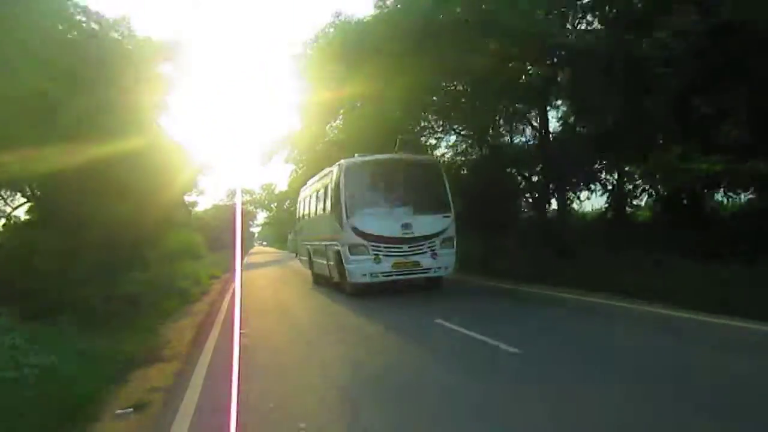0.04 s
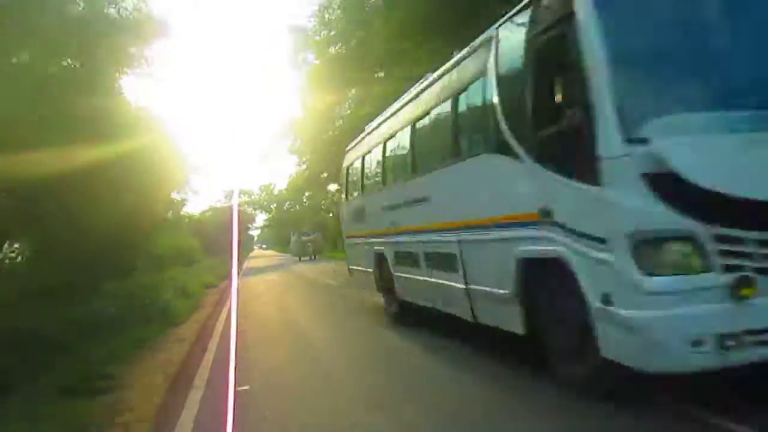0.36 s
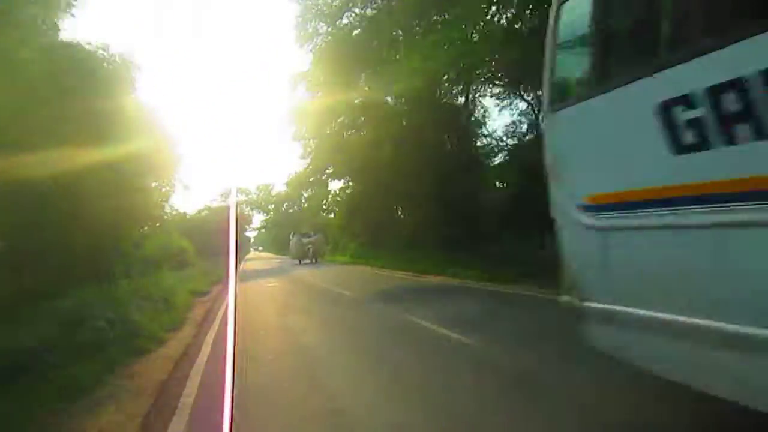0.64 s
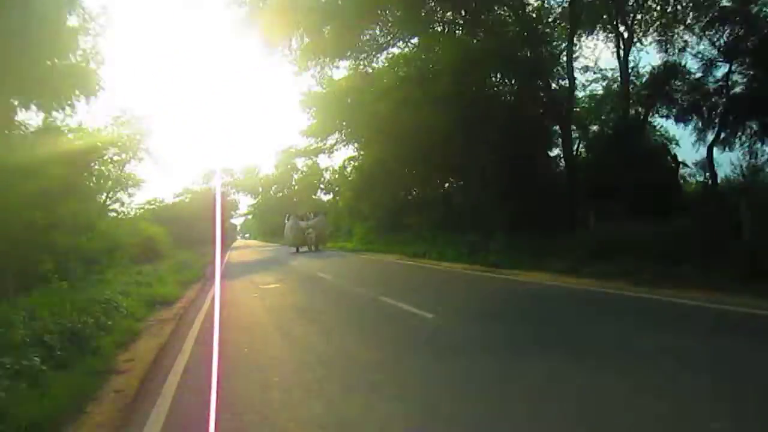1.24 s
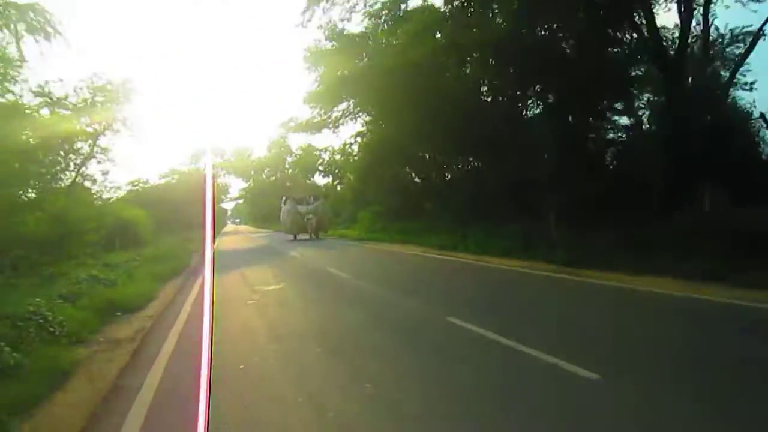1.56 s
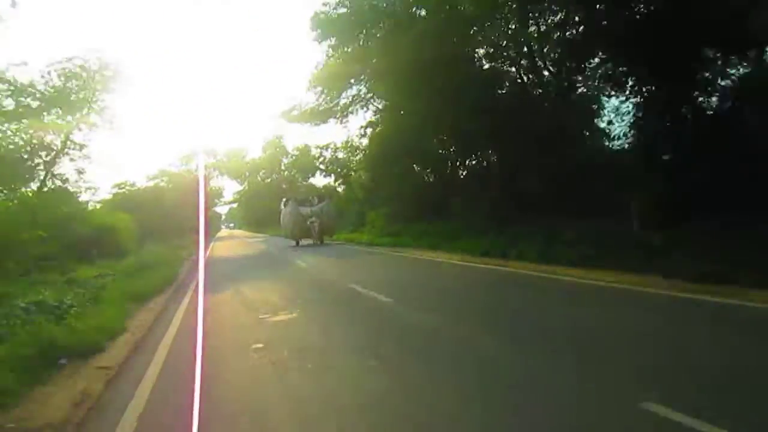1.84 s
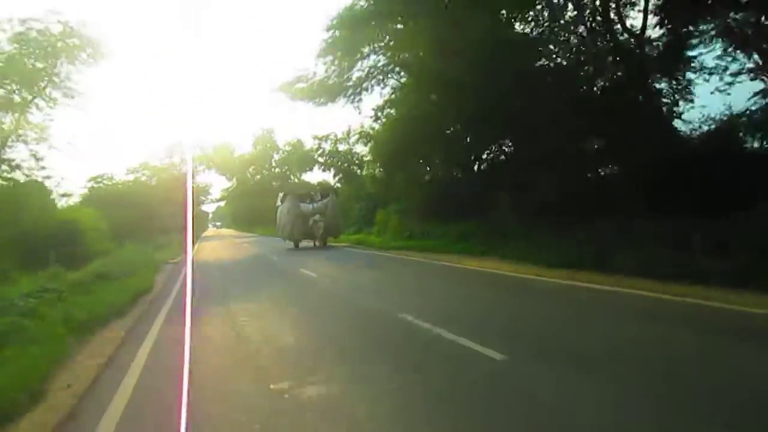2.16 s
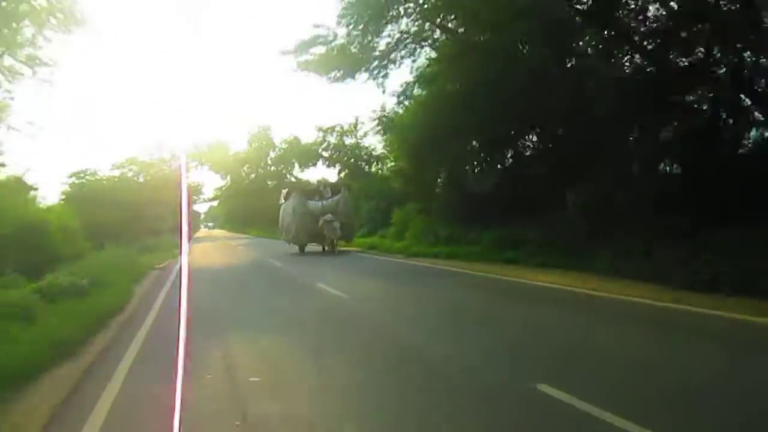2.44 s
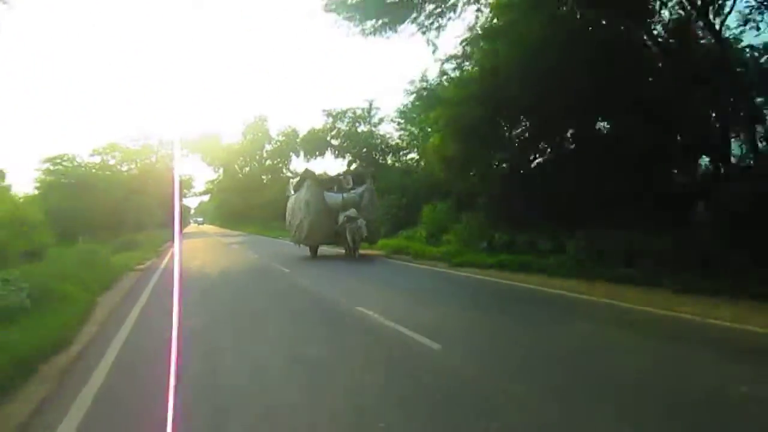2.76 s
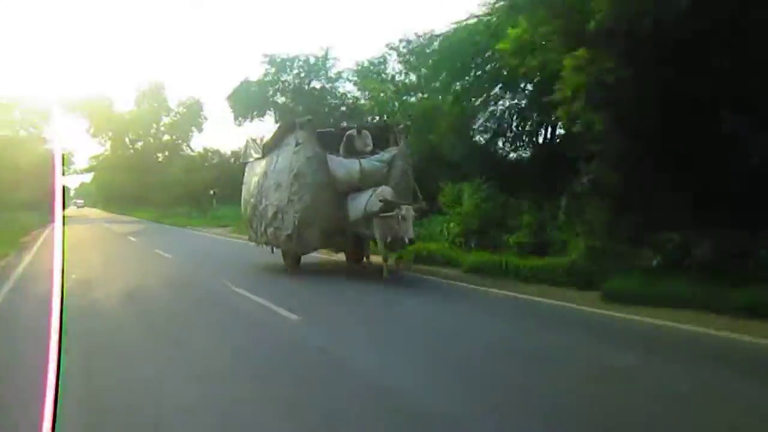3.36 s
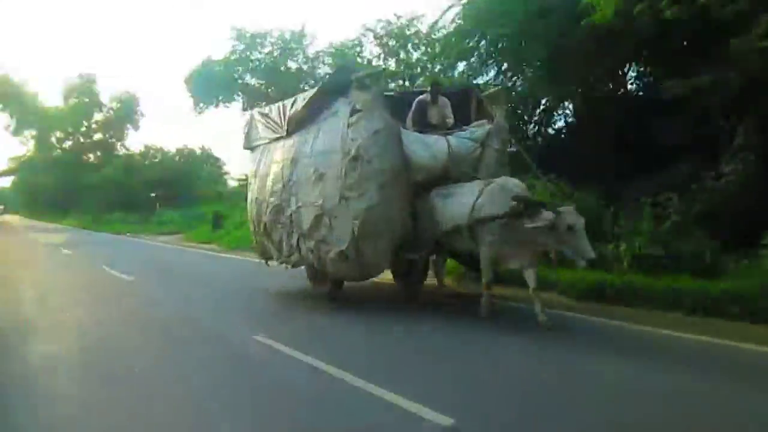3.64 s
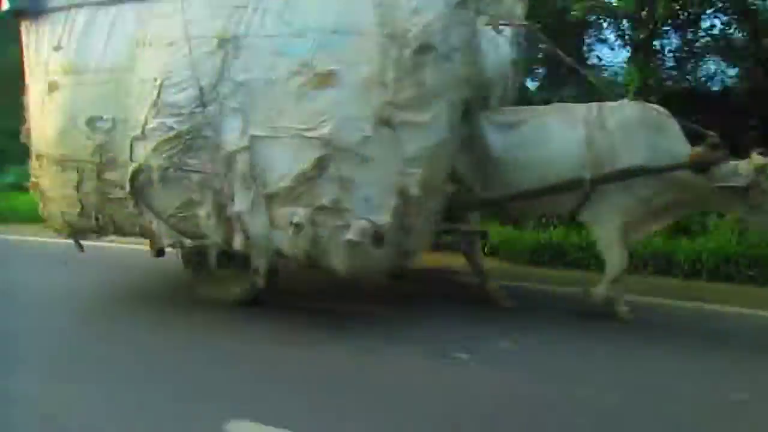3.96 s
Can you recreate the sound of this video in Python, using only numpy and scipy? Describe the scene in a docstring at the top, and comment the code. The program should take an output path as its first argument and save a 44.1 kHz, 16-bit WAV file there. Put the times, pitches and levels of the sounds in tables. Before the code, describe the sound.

Gusts of wind roar and flutter against a microphone riding along a country road, distorting into a crackle at their strongest. Low road rumble and faint tyre hiss run underneath, and dull thuds of air come near the end.

```python
"""Country road, on a moving vehicle: wind beats on the microphone over low road rumble and faint tyre hiss.
Each gust strengthens the large eddies a little and the small ones a lot; the strongest add a bright
rush of air. Single eddies hit as short slaps or dull thuds. The microphone overloads, so gusts and
slaps flatten into a rasping crackle."""
import sys
import numpy as np
from scipy import signal
from scipy.fft import rfft, irfft
from scipy.io import wavfile
from scipy.ndimage import map_coordinates

SR = 44100
rng = np.random.default_rng(int(sys.argv[2]) if len(sys.argv) > 2 else 0)


def put_to_file(sound):
    """Save the sound as 16-bit audio at rate SR, in the file named by the first command-line argument."""
    columns = np.atleast_2d(sound).T  # one column per channel
    safe = np.clip(columns, -1, 1)
    whole_steps = np.round(safe * 32767)
    wavfile.write(sys.argv[1], SR, whole_steps.astype(np.int16))


N = 176400

# gust strength at the microphone: t/s, level/dB
GUST_DB = [(0, -34.5), (.13, -27.5), (.3, -22.5), (.45, -20), (.7, -24.5), (.8, -28), (.87, -30.5),
           (1.03, -31), (1.12, -37), (1.18, -33), (1.29, -40.5), (1.37, -33), (1.48, -26), (1.56, -36.5),
           (1.62, -26.5), (1.7, -34), (1.8, -30), (1.88, -30.5), (1.98, -26.5), (2.08, -31.5), (2.2, -26),
           (2.3, -27.5), (2.39, -27), (2.44, -18), (2.6, -19.5), (2.75, -24), (2.85, -31), (2.97, -34),
           (3.08, -35.5), (3.16, -29), (3.3, -28.5), (3.42, -33.5), (3.6, -37), (3.7, -26.5), (3.8, -21),
           (3.84, -20.5), (4, -21.5)]
# mid-range roar, on top of the gusts: t/s, level/dB
ROAR_DB = [(0, 5.5), (.45, -1.5), (.85, 0.5), (1.25, 2), (1.7, .5), (1.85, 1), (1.97, 1.5), (2.25, 1),
           (2.5, 0), (2.8, 1), (3.05, -5), (3.3, -1), (3.58, -10.5), (3.78, -2.5), (3.95, -7.5)]
# large-eddy spectrum: f/Hz, level/dB
LARGE_EDDY_SPECTRUM_DB = [(20, -31), (60, -19), (130, -5.5), (220, -3), (330, -1), (480, 1), (800, -1.5),
                          (1100, -7), (1600, -16.5), (2400, -37.5), (4000, -60.5), (9000, -62)]
# small-eddy spectrum: f/Hz, level/dB
SMALL_EDDY_SPECTRUM_DB = [(100, -20.5), (500, -6), (1100, 4.5), (1800, -2), (3000, -9.5), (4500, -22),
                          (7000, -34.5), (14000, -53.5)]
# lulls, air leaves the microphone opening: t/s, depth/dB, length/s
LULLS = [(.06, 6, 0.076), (.78, 6, 0.026), (.94, 8.5, 0.028), (.975, 5, 0.012), (1.07, 4.5, 0.033),
         (1.133, 6.5, .03), (1.28, 6.5, 0.039), (1.545, 2.5, 0.028), (1.584, 15, 0.011),
         (1.668, 15, 0.0082), (1.823, 8, 0.073), (2.017, 11, 0.02), (2.293, 10, 0.019), (2.82, 27, 0.0056),
         (2.922, 6.5, 0.018), (3.005, 7, 0.024), (3.068, 6.5, 0.035), (3.22, 17, 0.0054),
         (3.335, 13, 0.012), (3.388, 9, 0.019), (3.42, 12, 0.0084), (3.49, -3.5, 0.0074), (3.555, 3, 0.034),
         (3.692, 14, 0.011), (3.722, 14, 0.0053)]
# low buffeting and road rumble: t/s, level/dB
RUMBLE_DB = [(0, -29), (.7, -25), (1.25, -29), (1.65, -26.5), (1.85, -24.5), (2.5, -22), (2.95, -24),
             (3.12, -16.5), (3.35, -20.5), (3.53, -19.5), (3.64, -21.5), (3.8, -15), (4, -20.5)]
# rumble spectrum: f/Hz, level/dB
RUMBLE_SPECTRUM_DB = [(15, -22.5), (35, -8.5), (70, -1), (140, -2.5), (280, -5), (500, -6.5), (1000, -40.5),
                      (3000, -60.5)]
# tyre and air hiss: t/s, level/dB
HISS_DB = [(0, -37), (.5, -40), (1.2, -40.5), (2.2, -39), (3, -40.5), (3.6, -30), (4, -42)]
# hiss spectrum: f/Hz, level/dB
HISS_SPECTRUM_DB = [(200, 6), (1200, 10), (2500, -5.5), (5000, -17), (8000, -23), (11000, -32.5),
                    (16000, -26)]
# slaps of air: t/s, relative peak level/dB, length/s
SLAPS = [(0.024, -10.5, 0.0084), (0.044, -19, 0.0041), (0.749, -17, 0.017), (.832, -21.5, 0.0082),
         (.915, -24, .01), (1.011, -18, 0.0096), (1.172, -36, 0.016), (1.48, -21.5, 0.04),
         (1.613, -15.5, 0.0068), (1.649, -13, 0.0096), (1.686, -10.5, 0.0096), (1.71, -13.5, 0.0034),
         (1.726, -14.5, 0.0031), (1.783, -24, .01), (2.054, -16.5, 0.023), (2.137, -10, 0.0021),
         (2.147, -4, 0.0028), (2.162, -8.5, 0.0068), (2.185, -11.5, 0.0079), (2.68, -10.5, 0.011),
         (2.837, -23.5, 0.0044), (2.888, -18, 0.0099), (3.036, -19, 0.023), (3.143, -22, 0.0087),
         (3.183, -19, 0.0036), (3.199, -11.5, 0.0052), (3.251, -18.5, .008), (3.705, -19.5, 0.0027),
         (3.751, -8.5, 0.0024), (3.81, -11, 0.008), (3.849, -15, 0.0073)]
# slap spectrum: f/Hz, level/dB
SLAP_SPECTRUM_DB = [(60, -12), (300, 2), (800, 3), (1600, -3), (3000, -9.5), (5000, -23.5), (8000, -37.5),
                    (14000, -53)]
# bright rush of air: t/s, level/dB
RUSH_DB = [(0, -42), (.2, -42), (.45, -25), (.7, -37.5), (.85, -59.5), (2.34, -63), (2.42, -28.5),
           (2.5, -28), (2.61, -19), (2.74, -36), (2.85, -60), (3.65, -60), (3.84, -34), (3.9, -21.5),
           (3.96, -14.5), (4, -20)]
# rush spectrum: f/Hz, level/dB
RUSH_SPECTRUM_DB = [(200, -17.5), (900, -6.5), (1700, 3.5), (3100, -1.5), (4500, -9), (7000, -24.5),
                    (14000, -49)]
# thuds of large slow eddies: t/s, peak level/dB, length/s
THUDS = [(3.16, -18, .08), (3.625, -11, 0.064), (3.82, -15, 0.1)]
# thud spectrum: f/Hz, level/dB
THUD_SPECTRUM_DB = [(50, -38), (100, -11), (140, -3.5), (190, -8.5), (300, -10), (600, -31), (1500, -66)]
# microphone response: f/Hz, gain/dB
MIC_RESPONSE_DB = [(20, -0.5), (2000, 0), (4000, -1.5), (7000, -2.5), (11000, -6.5), (16000, -9.5)]

GUST_REF_DB = -26.5  # gust strength at which LARGE_DB and SMALL_DB hold
LARGE_DB, LARGE_DB_PER_DB, LARGE_FLUTTER_DB = -10.5, 0.31, 1.8
SMALL_DB, SMALL_DB_PER_DB, SMALL_FLUTTER_DB = -26.5, 1.44, 1.7
FLUTTER_PER_S, BURSTS_PER_S = 130, 480


def undb(db):
    """Decibels to gain."""
    return 10 ** (np.asarray(db) / 20)


def curve(rows):
    """Linear interpolation of (t/s, value) rows."""
    times_s, values = np.array(rows, float).T
    return np.interp(np.arange(N) / SR, times_s, values)


def colour(x, response_db):
    """Filter by (f/Hz, gain/dB) rows, interpolated in log frequency."""
    f_hz, gain_db = np.array(response_db, float).T
    bins_hz = np.maximum(np.arange(N // 2 + 1) * SR / N, 1)
    gain = undb(np.interp(np.log(bins_hz), np.log(f_hz), gain_db))
    return irfft(rfft(x) * gain, N)


def noise(spectrum_db):
    """Random pressure of given spectral shape, rms 1."""
    x = colour(rng.standard_normal(N), spectrum_db)
    return x / x.std()


def jitter(rate_per_s):
    """Smooth random signal, standard deviation 1."""
    knots = rng.standard_normal(8192)
    x = map_coordinates(knots, [np.arange(N) / SR * rate_per_s], order=3, mode="wrap")
    return x / x.std()


def swells(rows):
    """One Gaussian hump per (t/s, height, length/s) row."""
    t_s = np.arange(N) / SR
    return sum(height * np.exp(-(2 * (t_s - at_s) / length_s) ** 2) for at_s, height, length_s in rows)


def wind(burst_db=6):
    """Large eddies roar, small ones tear past in bursts; both flutter together and drop in the lulls."""
    gust_db = curve(GUST_DB) - GUST_REF_DB
    flutter = jitter(FLUTTER_PER_S)
    large_db = LARGE_DB + LARGE_DB_PER_DB * gust_db + curve(ROAR_DB) + LARGE_FLUTTER_DB * flutter
    small_db = SMALL_DB + SMALL_DB_PER_DB * gust_db + SMALL_FLUTTER_DB * flutter
    small_db += burst_db * jitter(BURSTS_PER_S)
    roar = undb(large_db) * noise(LARGE_EDDY_SPECTRUM_DB)
    tearing = undb(small_db) * noise(SMALL_EDDY_SPECTRUM_DB)
    return (roar + tearing) * undb(-swells(LULLS))


def road(throb_db=0.58, throb_per_s=18):
    """Throbbing low rumble under smooth tyre and air hiss."""
    rumble = noise(RUMBLE_SPECTRUM_DB) * undb(curve(RUMBLE_DB) + throb_db * jitter(throb_per_s))
    hiss = noise(HISS_SPECTRUM_DB) * undb(curve(HISS_DB))
    return rumble + hiss


def eddy_hits(hits, spectrum_db, burst_db=2.4):
    """Single eddies hit the opening head on, each a brief, ragged pressure swell."""
    envelope = swells([(at_s, undb(peak_db), length_s) for at_s, peak_db, length_s in hits])
    return envelope * noise(spectrum_db) * undb(burst_db * jitter(BURSTS_PER_S))


def rush(burst_db=3):
    """Fast air of the strongest gusts tears across the opening."""
    return noise(RUSH_SPECTRUM_DB) * undb(curve(RUSH_DB) + burst_db * jitter(BURSTS_PER_S))


def scene(slap_gain_db=4):
    """Total pressure at the microphone, mono."""
    slaps = undb(slap_gain_db) * eddy_hits(SLAPS, SLAP_SPECTRUM_DB)
    thuds = eddy_hits(THUDS, THUD_SPECTRUM_DB)
    return (wind() + slaps + thuds + rush() + road())[None]


def record(dry, ceiling=0.46, knee=2.97, asymmetry=0.02, coupling_hz=22, top_hz=15800):
    """Microphone: soft, slightly uneven overload, then deep-bass loss, dulled treble, steep top cut."""
    drive = dry[0] / ceiling
    biased = drive * (1 - asymmetry * np.sign(drive))
    flattened = ceiling * drive / (1 + np.abs(biased) ** knee) ** (1 / knee)
    highpass = signal.butter(1, coupling_hz, "high", fs=SR, output="sos")
    lowpass = signal.ellip(10, .1, 80, top_hz, fs=SR, output="sos")
    dulled = colour(signal.sosfilt(highpass, flattened), MIC_RESPONSE_DB)
    return signal.sosfilt(lowpass, dulled)[None]


dry = scene()
out = record(dry)
put_to_file(out)
```